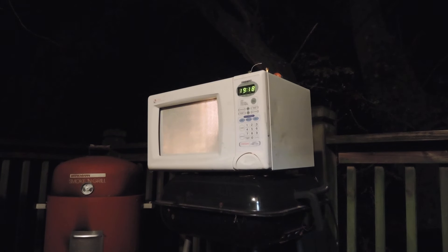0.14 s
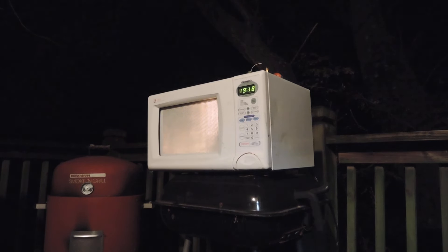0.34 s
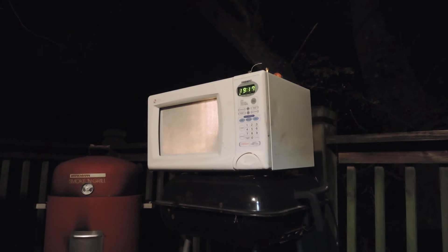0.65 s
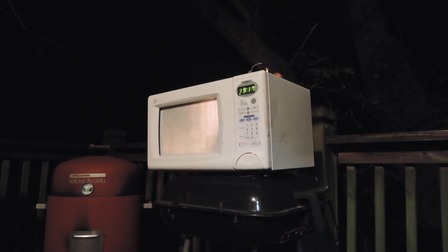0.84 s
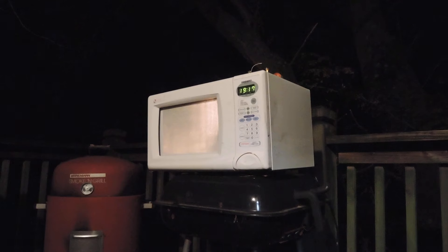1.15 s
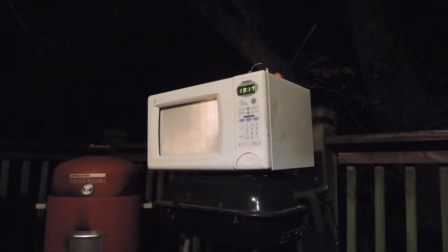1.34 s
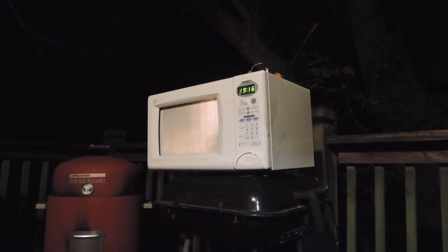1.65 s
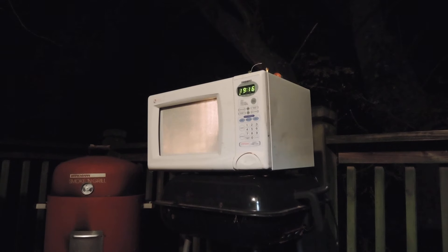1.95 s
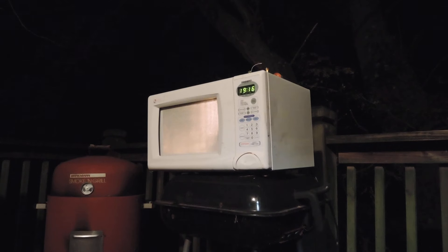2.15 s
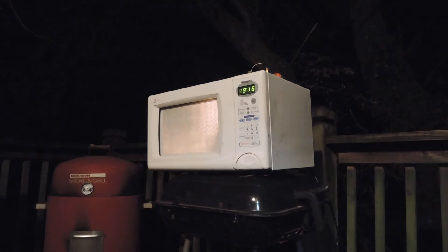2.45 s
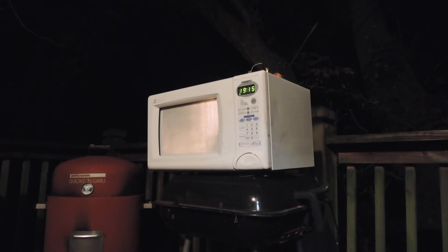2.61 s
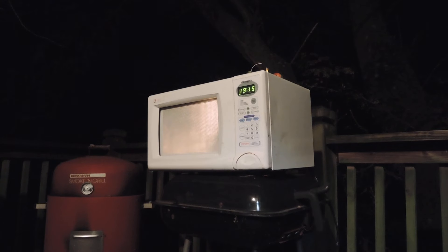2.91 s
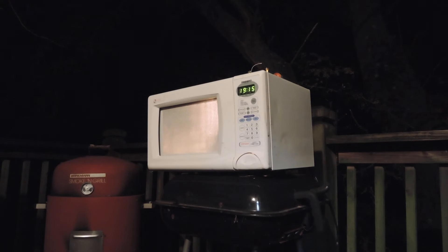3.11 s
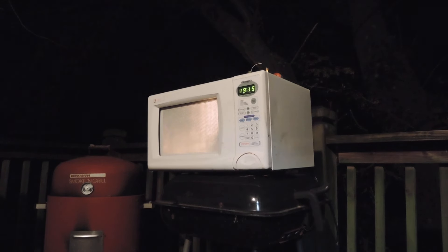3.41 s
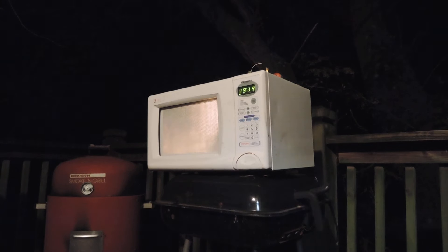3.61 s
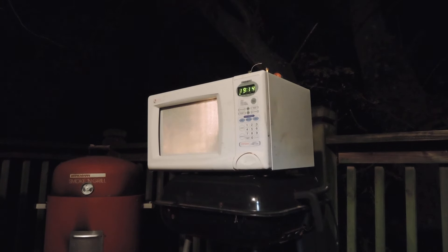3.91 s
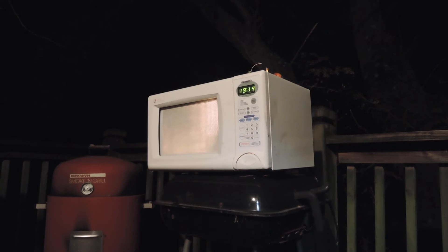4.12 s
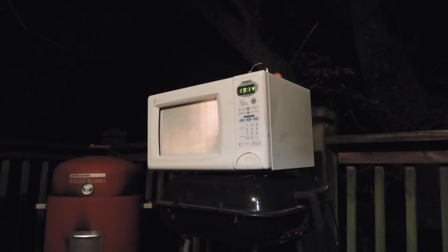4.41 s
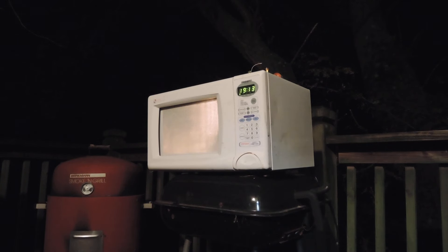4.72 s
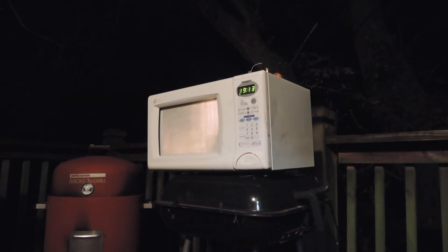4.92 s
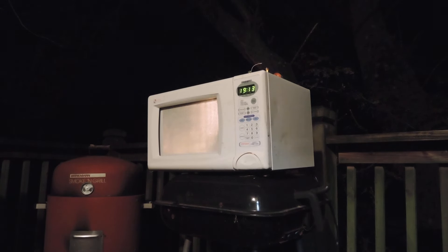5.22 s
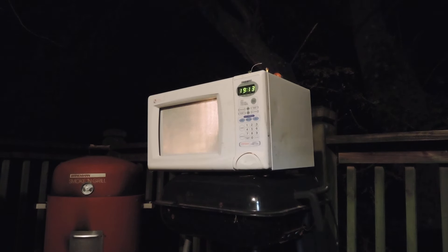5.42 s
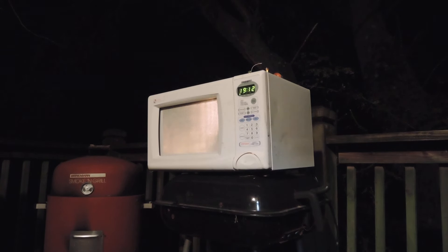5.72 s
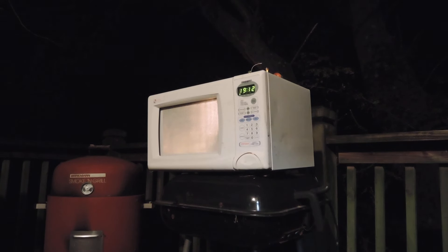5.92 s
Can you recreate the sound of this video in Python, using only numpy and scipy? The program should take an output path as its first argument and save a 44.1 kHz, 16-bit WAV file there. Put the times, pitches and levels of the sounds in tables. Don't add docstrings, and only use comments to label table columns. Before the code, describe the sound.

Continuous appliance drone outdoors: low transformer hum with a faint higher buzz, a wavering mid-low fan note that swells and sinks, rushing air and a trembling metallic rattle. The hum is strongest just after the start and weakest halfway. A soft sub-bass thump touches the camera around the middle; faint far traffic slightly lifts the rush, more near the end. Dry, near-centre pickup from two metres, light hiss.

```python
import sys
import numpy as np
from scipy import signal
from scipy.fft import rfft, irfft, next_fast_len
from scipy.io import wavfile
from scipy.ndimage import uniform_filter1d, map_coordinates

SR = 44100
rng = np.random.default_rng(int(sys.argv[2]) if len(sys.argv) > 2 else 0)


def how_loud(loudness_db):
    steps = np.asarray(loudness_db, float) / 20
    return 10 ** steps


def unload_wav(signal):
    wavfile.write(
        sys.argv[1],
        SR,
        np.round(np.clip(np.atleast_2d(signal).T, -1, 1) * 32767).astype(np.int16),
    )


N = 266937
T = np.arange(N) / SR
MAINS_HZ = 59.977


def unit(x):
    return x / np.sqrt(np.mean(x ** 2, axis=-1, keepdims=True) + 1e-20)


def wobble(rate_hz):
    return map_coordinates(rng.standard_normal(N // 100), [T * rate_hz])


def swell(time_s, level_db, half_s):
    return level_db * np.exp(-0.5 * ((T - time_s) / half_s) ** 2)


def noise(gain, channels=1):
    m = next_fast_len(N)
    white = rfft(rng.standard_normal((channels, m)))
    return unit(irfft(white * gain(np.fft.rfftfreq(m, 1 / SR)), m)[:, :N])


def slope(points):
    hz, db = np.transpose(points)
    return lambda f: how_loud(np.interp(np.log(f + 1), np.log(hz + 1), db, left=-120, right=-120))


def transformer():
    # mains_multiple, rms_db
    core_partials = [(2, -40), (3, -60), (6, -51), (10, -62), (14, -71), (16, -70), (18, -73)]
    # mains_multiple, rms_db
    buzz_partials = [(32, -74), (33, -78), (38, -81), (40, -76), (41, -70.5), (42, -77), (44, -76),
                     (48, -78), (49, -78), (52, -79), (54, -76), (55, -75), (56, -77), (58, -78), (60, -78),
                     (63, -71), (65, -74), (69, -76), (71, -84), (75, -81), (45, -80), (61, -79), (62, -79),
                     (79, -83), (87, -87), (98, -90)]
    # time_s, level_db
    hum_swell = [
        (0, 0.5),
        (.47, 2.5),
        (.9, 0),
        (2.2, -0.9),
        (3, -1.2),
        (3.3, 0),
        (4.7, 1),
        (6.05, 0),
    ]
    cycle = 2 * np.pi * MAINS_HZ * T

    def partial(multiple):
        return np.sqrt(2) * np.sin(multiple * cycle + rng.uniform(0, 2 * np.pi))

    core = sum(how_loud(db + 0.26 * wobble(2.83)) * partial(k) for k, db in core_partials)
    buzz = sum(how_loud(db + 1.3 * wobble(1.7)) * partial(k) for k, db in buzz_partials)
    swell_s, swell_db = np.transpose(hum_swell)
    return how_loud(np.interp(T, swell_s, swell_db)) * core + buzz


def fan_blades():
    # time_s, rise_db
    surges = [(.25, 6), (.66, 11.5), (1.08, 7), (1.5, 11), (1.85, 7), (2.22, 10.5), (2.62, 7), (3.0, 9.5),
              (3.72, 8), (4.5, 9), (5.1, 10), (5.82, 9.5)]
    blade_hz, rest_db, surge_half_s = 322.5, -58, 0.11
    level_db = rest_db + sum(swell(s, db, surge_half_s) for s, db in surges)
    phase = 2 * np.pi * blade_hz * T + 0.48 * wobble(4.61)
    uneven = how_loud(-4.5) * np.sin(phase / 2) + how_loud(-14.0) * np.sin(3 * phase / 2)
    return np.sqrt(2) * how_loud(level_db + 1.27 * wobble(14)) * (np.sin(phase) + uneven)


def cavity_boom():
    # frequency_hz, density_db (per Hz)
    boom_spectrum = [(10, 5), (24, -1.5), (38, -3.5), (75, -3), (95, 3.5), (118, 1), (145, 0), (175, -8.5),
                     (225, -5), (265, -9), (300, -11), (330, -5), (365, -15), (520, -48)]
    return how_loud(-40) * noise(slope(boom_spectrum))[0]


def air_rush():
    # frequency_hz, density_db (per Hz)
    rush_spectrum = [(150, -32), (380, -1.5), (520, -1.5), (680, 0.5), (850, 0), (1050, -3.5), (1350, -8),
                     (1650, -11), (2200, -16), (4000, -24), (7000, -38), (12000, -51), (16500, -58.5)]
    # time_s, rise_db, half_length_s
    traffic = [
        (2.0, 1, 0.25),
        (5.68, 2.5, 0.21),
    ]
    level_db = -45.5 + sum(swell(*car) for car in traffic)
    return how_loud(level_db + 0.36 * wobble(12)) * noise(slope(rush_spectrum))[0]


def casing():
    # centre_hz, width_hz, level_db
    resonances = [(663, 41, 10), (787, 29, 6.5), (838, 25, 5.5), (970, 42, 5.5), (1356, 41, 2.5), (1432, 40, 5),
                  (1720, 69, 6), (1775, 40, -1), (2060, 90, -4.5), (2380, 50, 0.5), (2620, 40, 1.5),
                  (2770, 82, 0.5), (2896, 61, -0.5), (2944, 48, 1), (3066, 90, 1.5), (3195, 47, 3),
                  (3300, 46, -1), (3410, 85, 2), (3500, 72, -1.5), (3622, 62, 3), (3720, 102, 3.5),
                  (3890, 35, -8), (3973, 43, 0), (4050, 48, -1.5), (4200, 48, -9), (4450, 70, -9.5),
                  (4760, 90, -7.5), (4950, 80, -6), (5133, 43, -6.5), (5390, 26, -16)]
    # time_s, change_db
    shudders = [
        (.35, 3),
        (1.4, -2),
        (1.9, 3),
        (2.15, -2),
        (5.3, -3),
    ]
    # time_s, peak_db, pitch_hz, length_s
    ping = (3.73, -55, 4097, .055)

    def modes(f):
        power = sum(how_loud(2 * db) / (1 + (2 * (f - centre) / width) ** 2) ** 2 for centre, width, db in resonances)
        return np.sqrt(power)

    pulls = how_loud(0.96 * np.sin(4 * np.pi * MAINS_HZ * T))
    tremor = wobble(20)
    tremor = tremor - uniform_filter1d(tremor, size=SR // 8)
    shake = how_loud(1.2 * tremor)
    shudder_half_s = 0.059
    level_db = -54.8 + 0.25 * wobble(4.1) + sum(swell(s, db, shudder_half_s) for s, db in shudders)
    rattle = how_loud(level_db) * shake * pulls * noise(modes)[0]

    start_s, peak_db, pitch_hz, length_s = ping
    progress = np.clip((T - start_s) / length_s, 0, 1)
    return rattle + how_loud(peak_db) * np.sin(np.pi * progress) * np.sin(2 * np.pi * pitch_hz * T)


def bump():
    # start_s, peak_db, pitch_hz, t60_s
    push = (3.119, -26, 21, .24)
    start_s, peak_db, pitch_hz, t60_s = push
    t = np.clip(T - start_s, 0, None)
    onset = 1 - np.exp(-t / 0.001)
    return -how_loud(peak_db - 60 * t / t60_s) * onset * np.cos(2 * np.pi * pitch_hz * t)


def microphone_hiss():
    # frequency_hz, density_db (per Hz)
    hiss_spectrum = [(20, -0.5), (300, -14.5), (1000, -19), (1500, -22.5), (4000, -23), (7000, -27),
                     (10500, -31.5), (16000, -39.5)]
    own = how_loud(-58.0) * noise(slope(hiss_spectrum), channels=2)
    shared = how_loud(-59.5) * noise(slope(hiss_spectrum))
    return own + shared


def scene():
    fan = fan_blades() + cavity_boom() + air_rush()
    oven = transformer() + fan + casing() + bump()
    return oven * how_loud([[-0.3], [0.3]])


def low_pass(x):
    return signal.sosfilt(signal.butter(12, 15870, fs=SR, output="sos"), x)


def record(dry):
    m = next_fast_len(N)
    passed = np.fft.rfftfreq(m, 1 / SR) < 15730
    mix = irfft(rfft(dry + microphone_hiss(), m) * passed, m)[:, :N]
    return low_pass(mix)


dry = scene()
out = record(dry)
unload_wav(out)
```